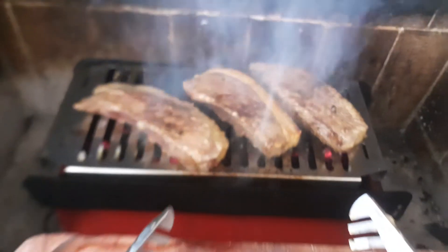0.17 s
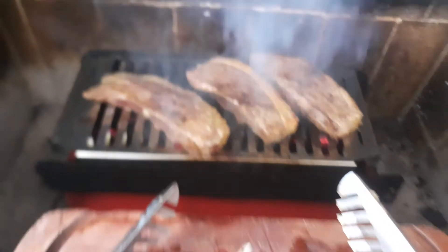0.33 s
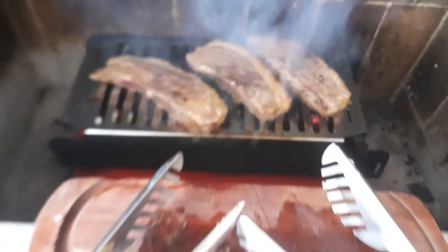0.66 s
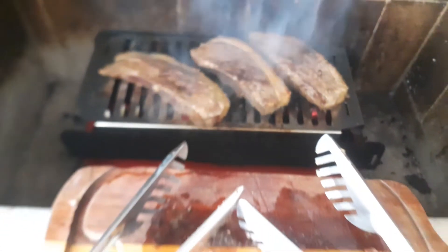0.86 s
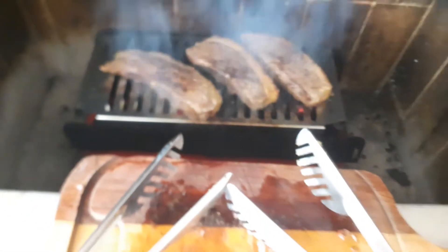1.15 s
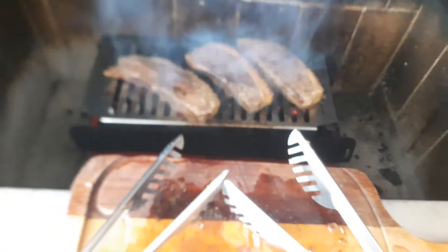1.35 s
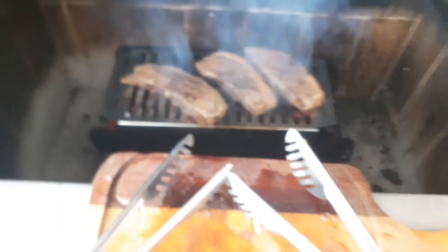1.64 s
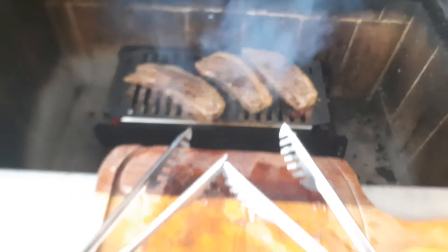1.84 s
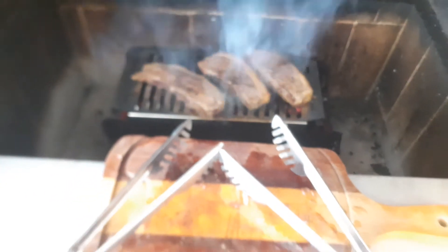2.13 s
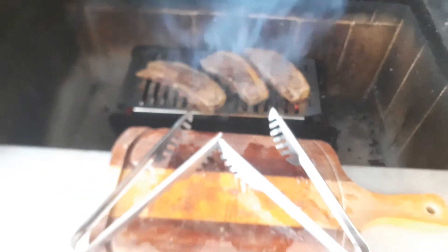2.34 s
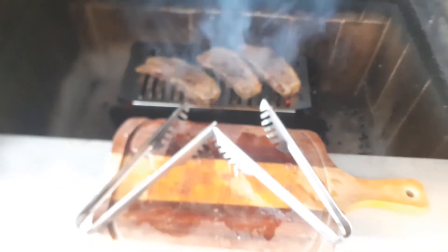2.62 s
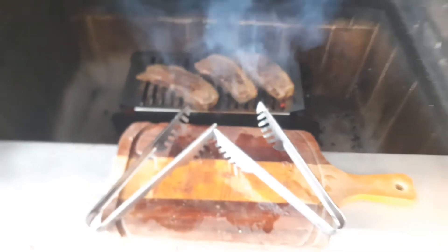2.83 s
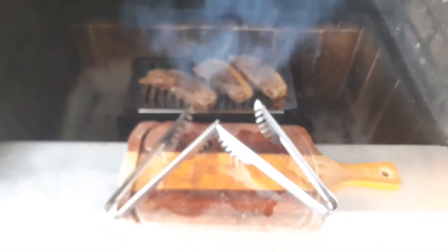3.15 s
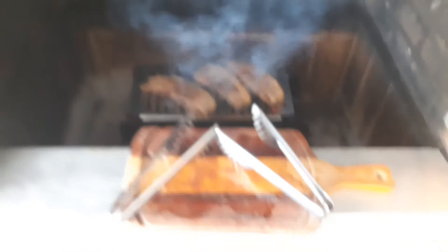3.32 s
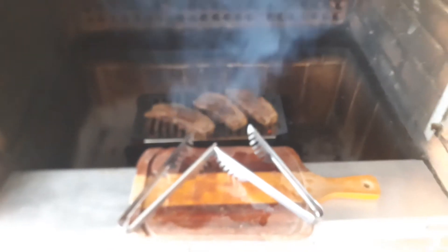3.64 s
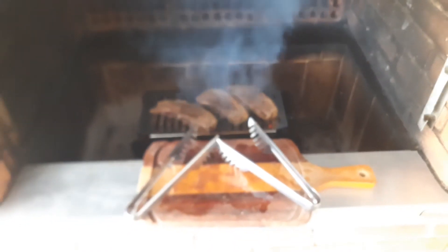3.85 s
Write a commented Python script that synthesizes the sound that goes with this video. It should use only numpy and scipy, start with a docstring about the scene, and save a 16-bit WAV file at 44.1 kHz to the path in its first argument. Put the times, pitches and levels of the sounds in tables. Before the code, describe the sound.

Meat sizzles on a barbecue grill with bright crackling hiss, fat spits and dull handling bumps

```python
"""In a brick hearth, meat sizzles on a barbecue grill, heard by a hand-held phone with one port covered.
Left, the open port: hissing juice as coloured noise with crackling clicks, spitting fat as bursts of
band noise, both with dense wall echoes; taps ring the modes of the grate, and a faint hum is a harmonic tone.
Right, the covered port: rumble and scuffing of the grip as low noise, bumps as short dull wave packets,
and the outside sound so muffled that little more than the very top of the sizzle comes through."""
import sys
import numpy as np
from scipy import signal
from scipy.fft import rfft, irfft
from scipy.io import wavfile
from scipy.ndimage import uniform_filter1d

SR = 44100
rng = np.random.default_rng(int(sys.argv[2]) if len(sys.argv) > 2 else 0)


def wrap_up_sound(samples):
    """Save the sound to the file named by the first command line argument, as 16-bit audio."""
    columns = np.atleast_2d(samples).T
    # keep every value between -1 and 1, then stretch to whole-number steps
    tamed = np.clip(columns, -1, 1)
    steps = np.round(tamed * 32767).astype(np.int16)
    wavfile.write(sys.argv[1], SR, steps)


def field_ratio(decibels):
    """Amplitude ratio for a level in dB (20 dB per decade); scalars and array-likes work."""
    return 10 ** (np.asarray(decibels, dtype=float) / 20)


N = 175518  # samples in the scene

# Modes of the grate before scatter and damping: (frequency [Hz], relative level [dB], t60 [s])
GRATE = [(300, 3, 0.046), (517, 6.5, 0.071), (654, 7, 0.05), (797, -4.5, 0.078), (968, -8.5, 0.044),
         (1219, 4, 0.036), (1464, -2.5, 0.042), (1647, 0.5, 0.045), (2286, 1, 0.026), (2734, -3.5, 0.039),
         (3330, 2, 0.021)]


def unit(x):
    """Normalises a signal to a root mean square of one."""
    return x / np.sqrt(np.mean(x ** 2))


def curve(table, axis=1):
    """A column of a table as a function of time, by linear interpolation."""
    points = np.array(table)
    return np.interp(np.arange(N) / SR, points[:, 0], points[:, axis])


def octaves():
    """The frequency axis of the spectrum on a logarithmic scale, log2 of Hz."""
    return np.log2(np.maximum(np.arange(N // 2 + 1) * SR / N, 1))


def colour(x, table):
    """Linear filtering: weights the spectrum by (frequency [Hz], gain [dB]) points."""
    hz, db = np.array(table).T
    gain = field_ratio(np.interp(octaves(), np.log2(hz), db))
    return irfft(rfft(x) * gain, N)


def walk(rate):
    """Band-limited fluctuation: random levels, `rate` a second, joined without slow drift; spread 1."""
    k = int(SR / rate)
    steps = np.repeat(rng.standard_normal(N // k + 1), k)
    slewed = uniform_filter1d(steps, k)[:N]
    return unit(slewed - uniform_filter1d(slewed, 4 * k))


def sizes(draw, spread_db):
    """Exponential distribution of levels: many small, a few large, none huge."""
    return field_ratio(np.minimum(-np.log(1 - draw), 4.5) * spread_db)


def clicks(per_s, spread_db):
    """Poisson impulse train: clicks of either sign at independent random moments."""
    moment, sign, size = rng.random((3, N))
    return unit((moment < per_s / SR) * np.sign(sign - .5) * sizes(size, spread_db))


def add(out, at_s, sound):
    """Superposition: mixes a sound in from the given moment."""
    i = max(int(at_s * SR), 0)
    out[i:i + len(sound)] += sound[:len(out) - i]


def sizzle():
    """Turbulent steam and bursting bubbles: modulated broadband noise, lifted at the grate's resonances."""
    # Course of the hiss: (time [s], level of the treble [dB], level of the middle [dB])
    levels = [(0, -37, -41.5), (.27, -34.5, -41.5), (.33, -36.5, -44.5), (.635, -36.5, -41),
              (.66, -28.5, -37.5), (.95, -33, -38.5), (1.1, -28.5, -39.5), (1.22, -32, -39.5),
              (1.5, -30.5, -39.5), (1.95, -33, -41), (2.45, -32.5, -42.5), (2.6, -32.5, -40),
              (3.12, -31.5, -40.5), (3.15, -31, -40), (3.22, -30, -37), (3.25, -24, -35),
              (3.29, -24, -38.5), (3.68, -25, -38), (3.75, -25, -36), (3.98, -27.5, -37.5)]
    # Spectral density of the hiss: (frequency [Hz], relative density [dB per Hz])
    density = [(30, -36), (90, -34), (170, -12.5), (280, -10), (400, -17), (600, -16.5), (950, -16),
               (1300, -12.5), (2500, -8.5), (5000, -9), (7300, -5.5), (9200, 2), (10000, 2.5), (12000, 9),
               (14500, 9), (17000, 10)]
    crackles_per_s, crackle_spread_db, crackle_db = 900, 3, -3.5  # crackle_db: against the steam noise
    ring_db = -5.5  # the sizzle keeps the grate ringing faintly
    # dB per unit of each fluctuation: shared by all bands, by neighbours, each band's own
    swell_db, neighbour_db, flicker_db = 0.54, 0.34, 0.57
    treble_from_hz = 8120

    steam = rng.standard_normal(N)
    raw = steam + field_ratio(crackle_db) * clicks(crackles_per_s, crackle_spread_db)
    hz = 2 ** octaves()
    ring = 0
    for mode_hz, db, t60 in GRATE:
        drive = field_ratio(db) * min(900 / mode_hz, 1)  # higher modes are driven less
        ring = ring + drive / np.hypot(1, (hz - mode_hz) * t60 / 0.81)
    spectrum = rfft(colour(raw, density)) * (1 + ring * field_ratio(ring_db))

    swell = walk(20) + 1.77 * walk(45)
    near, middle, treble = walk(13), 0, 0
    for centre in np.arange(4.5, 14.6, .5):  # log2 of Hz, half an octave apart
        window = np.cos(np.pi * np.clip(octaves() - centre, -.5, .5)) ** 2
        band = irfft(spectrum * window, N)
        near = unit(near + walk(16))  # adjacent bands stay correlated
        band = band * field_ratio(swell_db * swell + neighbour_db * near + flicker_db * walk(24.964))
        share = 1 / (1 + (treble_from_hz / 2 ** centre) ** 6)
        middle = middle + (1 - share) * band
        treble = treble + share * band
    return unit(treble) * field_ratio(curve(levels)) + unit(middle) * field_ratio(curve(levels, axis=2))


def spits():
    """Spitting fat as transient noise: a band round a centre, fast onset, exponential decay."""
    # Bursts: (time [s], noise level before the envelope [dB], centre [Hz], t60 [s])
    bursts = [(0.0237, -24, 10900, 0.045), (0.483, -35, 3300, 0.025), (.648, -42.5, 4740, 0.39),
              (.668, -29.5, 12500, 0.28), (1.104, -28.5, 13300, 0.048), (1.384, -27.5, 9000, 0.048),
              (1.454, -18, 10100, 0.006), (1.501, -20, 12000, 0.036), (1.8518, -39, 3220, .12),
              (2.527, -25.5, 12330, 0.039), (2.649, -24, 12000, 0.017), (3.138, -30, 10400, 0.42),
              (3.2277, -20, 10700, 0.18), (3.452, -20, 14000, 0.024), (3.566, -18.5, 13040, 0.03),
              (3.7315, -18, 12630, 0.0092)]
    width = 0.45  # two standard deviations of the band, as a share of its centre
    out, t = np.zeros(N), np.arange(SR // 8) / SR
    hz_axis = np.arange(len(t) // 2 + 1) * SR / len(t)
    for s, db, hz, t60 in bursts:
        band = np.exp(-2 * ((hz_axis - hz) / (width * hz)) ** 2)
        noise = unit(irfft(rfft(rng.standard_normal(len(t))) * band, len(t)))
        envelope = np.minimum(t / (0.019 * t60), 1) * 1000 ** (-t / t60)
        add(out, s, field_ratio(db) * noise * envelope)
    return out


def taps():
    """Modal synthesis: each tap excites damped modes of the grate near its centre; the bars rattle."""
    # Taps: (time [s], rms level of the first 5 ms [dB], centre [Hz])
    strokes = [(0.025, -27.5, 1300), (0.0327, -31.5, 950), (0.604, -39, 2220), (1.003, -46, 450),
               (1.02, -44, 430), (1.263, -44.5, 673), (1.7099, -36, 2000), (3.33, -36, 1950)]
    damping = .6  # factor on t60: the meat shortens the ring
    scatter_db = 2.2  # each tap weighs the modes anew
    skirt_db = 4  # lost one octave from the centre, growing as the square of the distance
    out, t = np.zeros(N), np.arange(SR // 6) / SR
    hz, db, t60 = np.array(GRATE).T[:, :, None]
    for s, level_db, centre_hz in strokes:
        weight, detune, phase = rng.standard_normal((3, len(GRATE), 1))
        strength = field_ratio(db + scatter_db * weight - skirt_db * np.log2(hz / centre_hz) ** 2)
        tones = np.sin(2 * np.pi * (hz * (1 + 0.028 * detune) * t + phase))
        envelope = np.minimum(t / 0.00089, 1) * 1000 ** (-t / (damping * t60))
        rattle = 1 + 0.6 * np.repeat(rng.standard_normal(len(t) // 10), 10)
        ring = (strength * tones * envelope).sum(axis=0) * rattle
        add(out, s, field_ratio(level_db) * ring / np.sqrt(np.mean(ring[:SR // 200] ** 2)))
    return out


def hearth(x):
    """Reverberation: convolves with dense decaying wall echoes that shift with the phone and sizzling spots."""
    echo_db, t60_s, first_echo_s = -6.5, 0.037, .0008  # echo_db: against the direct sound
    shift_s = .11  # a new echo pattern fades in at this interval
    hop, t = int(shift_s * SR), np.arange(SR // 12) / SR
    out, padded = np.zeros(N + 4 * hop + len(t)), np.pad(x, (hop, 2 * hop))
    fade = np.sin(np.pi * np.arange(2 * hop) / (2 * hop))
    for i in range(0, N + hop, hop):
        echoes = rng.standard_normal(len(t)) * 1000 ** (-t / t60_s) * (t > first_echo_s)
        echoes = echoes / np.sqrt(np.sum(echoes ** 2))
        add(out, i / SR, signal.fftconvolve(padded[i:i + 2 * hop] * fade, echoes))
    return (x + field_ratio(echo_db) * out[hop:hop + N]) / np.hypot(1, field_ratio(echo_db))


def grip():
    """Contact noise: jolting low rumble, skin scuffing in nudges, bumps whose main swing is a pressure drop."""
    # Spectral density of the handling noise: (frequency [Hz], relative density [dB per Hz])
    density = [(22, -29), (35, -20.5), (55, -2.5), (98, 0), (125, -2.5), (160, -8.5), (200, -15),
               (300, -20.5), (500, -42.5), (700, -53), (950, -77), (2000, -99), (6000, -120)]
    # Course of the handling noise: (time [s], level of the deep rumble [dB], level of the scuffing [dB])
    levels = [(0, -36, -46), (.7, -36.5, -50.5), (1.03, -31, -40.5), (1.15, -32.5, -44.5),
              (1.27, -28.5, -39), (1.7, -34.5, -44.5), (2.1, -32.5, -40.5), (2.35, -32, -52),
              (2.65, -31, -42.5), (2.8, -27, -47.5), (3.1, -32, -43), (3.75, -32.5, -48.5),
              (3.9, -33.5, -36)]
    # Bumps: (time of the centre [s], peak [dB], frequency [Hz], length between 1/e points [cycles])
    thuds = [(0.0973, -28.5, 258, 2.3), (.11, -23, 109, 2.4), (0.348, -28, 101, 1.6),
             (0.424, -27, 227, 0.77), (0.429, -16.5, 103, 1.7), (0.558, -24.5, 101, 2.5),
             (0.7431, -23, 104, 1.6), (.847, -20, 258, 1.28), (0.857, -16, 97, 2.1),
             (1.122, -31.5, 258, 1.7), (1.238, -29, 290, 1.6), (1.27, -24.5, 300, 2),
             (1.289, -22, 272, 1.36), (1.289, -19, 102, 2.5), (1.605, -12.5, 300, 1.53),
             (1.6146, -12.5, 100, 1.5), (1.6266, -21, 287, 1.6), (1.637, -16.5, 98, 2.1),
             (1.852, -22, 101, 1.9), (2.092, -27.5, 240, 1.15), (2.1132, -24.5, 269.5, 1.2),
             (2.4548, -14.5, 237, 0.92), (2.552, -24, 250, 1.4), (2.649, -30.5, 267, 1.4),
             (2.681, -32, 300, 1.5), (2.715, -31.5, 242, 2.3), (2.721, -18.5, 106.2, 1.6),
             (2.787, -34.5, 255, 1.8), (2.792, -21, 103, 1.3), (2.815, -35.5, 408, 1.8),
             (2.955, -39.5, 370, 2.1), (3.185, -33, 278, 1.87), (3.3664, -22.5, 100.6, 1.9),
             (3.3952, -20.5, 331.3, 1.73), (3.4552, -28.5, 282, 1.2), (3.5395, -20.5, 261, 1.8),
             (3.8613, -27, 268, 1.7), (3.8771, -22, 253, 1.02), (3.881, -15, 107, 1.7),
             (3.929, -17.5, 105.7, 1.46), (3.9442, -12.5, 261.3, 1.26)]
    jolts_per_s, jolt_uneven = 19, .3  # mean rate; relative spread of the rate
    jolt_fade = .62  # decay to 1/e, as a share of the gap
    waver_db, scuff_from_hz = 1.5, 160
    nudges_per_s, nudge_spread_db, nudge_db = 110, 3, 2  # nudge_db: against the scuffing noise

    jolts = np.cumsum(jolts_per_s * (1 + jolt_uneven * walk(9))) / SR % 1
    waver = field_ratio(waver_db * walk(22.2)) * np.exp(-jolts / jolt_fade)
    deep = 1 / (1 + (2 ** octaves() / scuff_from_hz) ** 4)
    rumble = colour(rng.standard_normal(N) * waver, density)
    rubbing = rng.standard_normal(N) + field_ratio(nudge_db) * clicks(nudges_per_s, nudge_spread_db)
    scuff = colour(rubbing * waver, density)
    out = unit(irfft(rfft(rumble) * deep, N)) * field_ratio(curve(levels))
    out += unit(irfft(rfft(scuff) * (1 - deep), N)) * field_ratio(curve(levels, axis=2))

    t = np.arange(-SR // 25, SR // 25) / SR
    for s, db, hz, cycles in thuds:
        envelope = np.exp(-np.abs(2 * hz * t / cycles) ** 2)
        add(out, s + t[0], -field_ratio(db) * np.cos(2 * np.pi * hz * t) * envelope)
    return out


def hum():
    """Harmonic series: a faint low tone with two overtones, each wavering in level."""
    # Course of the hum: (time [s], fundamental before its waver [Hz], level [dB])
    course = [(0, 51, -59), (.6, 63.7, -62), (.8, 62.6, -50), (1.4, 63.6, -48), (1.7, 58.6, -61),
              (2.2, 57.9, -52.5), (3.1, 58.5, -53), (3.6, 60.4, -43), (3.98, 58.5, -43)]
    # Partials: (multiple of the fundamental, relative level before its waver [dB])
    partials = [(1, -1.5), (2, -18), (5, -30)]
    waver_db = 4.5
    phase = 2 * np.pi * np.cumsum(curve(course) * (1 + 0.0101 * walk(12))) / SR
    tone = 0
    for k, db in partials:
        tone = tone + field_ratio(db + waver_db * walk(6.9)) * np.sqrt(2) * np.sin(k * phase)
    return tone * field_ratio(curve(course, axis=2))


def scene():
    """Transmission loss: the open port hears the grill, the covered one the grip and a late muffled grill."""
    # What passes the cover: (frequency [Hz], gain [dB])
    cover = [(2500, -60), (6900, -52), (10000, -50), (12000, -45), (16000, -27)]
    grill = hearth(sizzle() + spits()) + taps()
    muffled = colour(grill, cover) * field_ratio(0.99 * walk(29.87))  # its level flutters
    late = np.roll(muffled, SR // 60)
    return np.array([grill + hum(), grip() + late])


def roll_off(x):
    """The treble ends steeply here."""
    return signal.sosfilt(signal.butter(12, 16790, fs=SR, output="sos"), x)


def record(dry):
    """Band limitation: the phone cuts the top with a steep elliptic low-pass."""
    top_hz = 15470
    low_pass = signal.ellip(14, .2, 75, top_hz, fs=SR, output="sos")
    mix = signal.sosfilt(low_pass, dry)
    return roll_off(mix)


dry = scene()
out = record(dry)
wrap_up_sound(out)
```